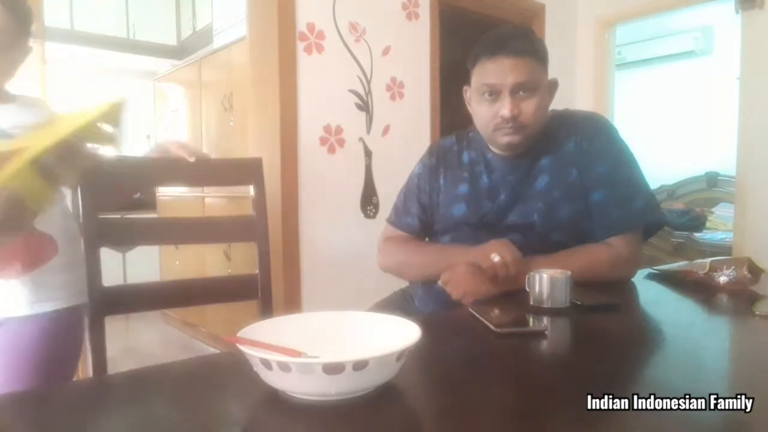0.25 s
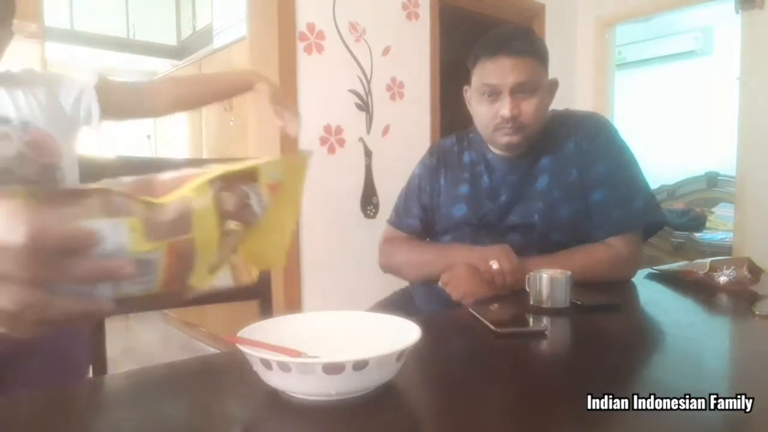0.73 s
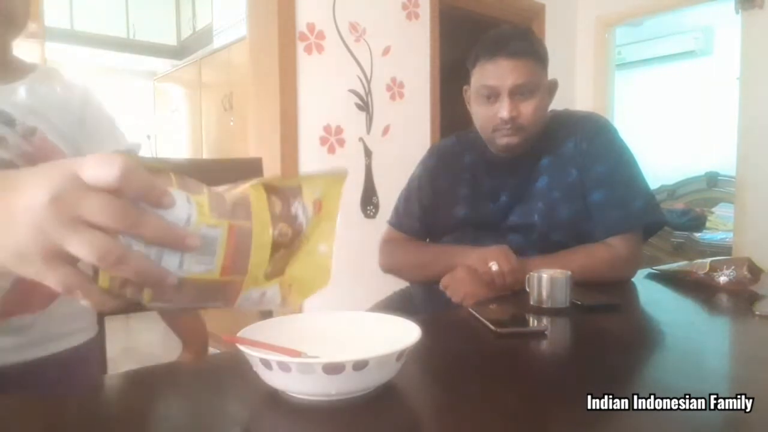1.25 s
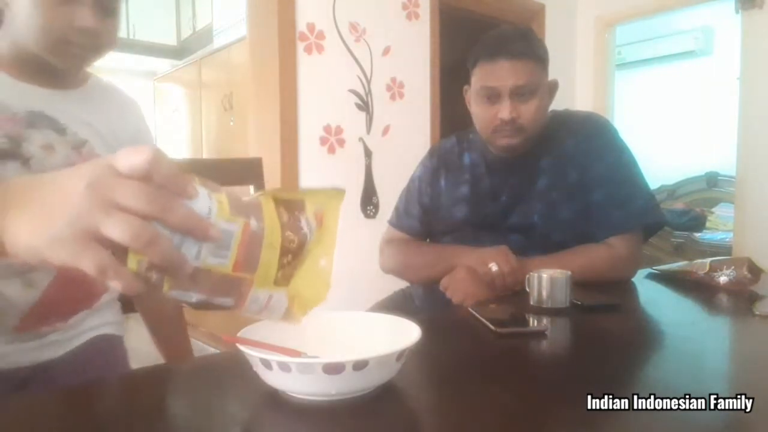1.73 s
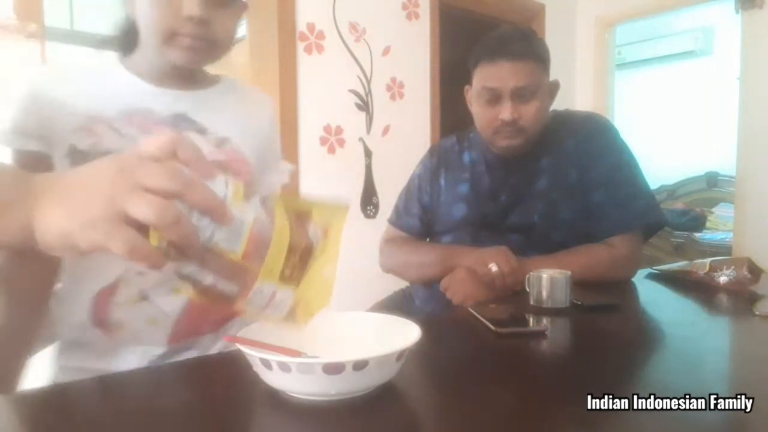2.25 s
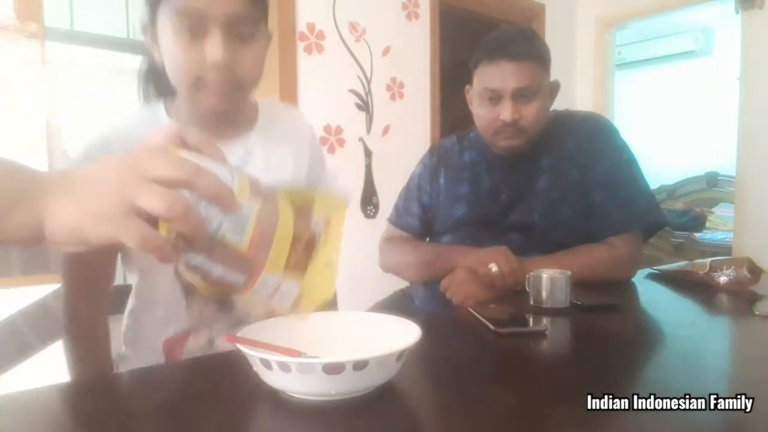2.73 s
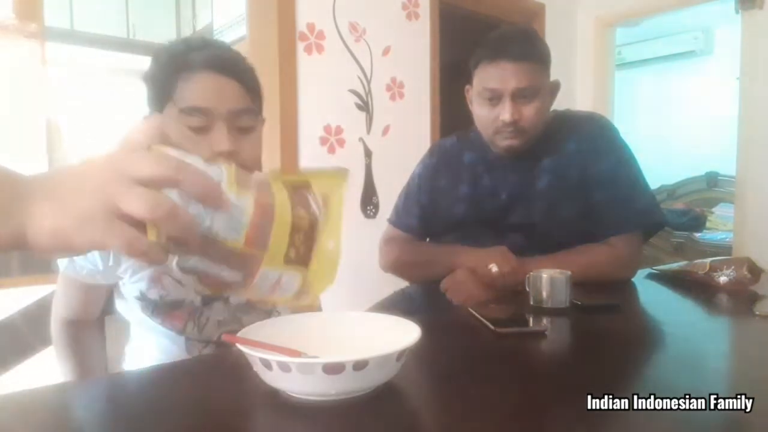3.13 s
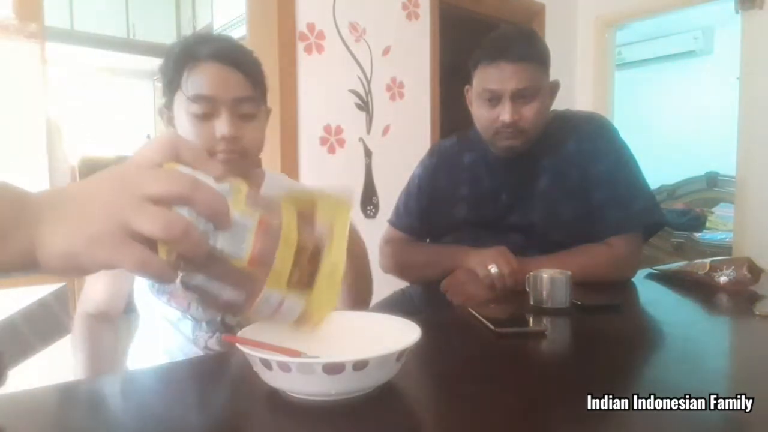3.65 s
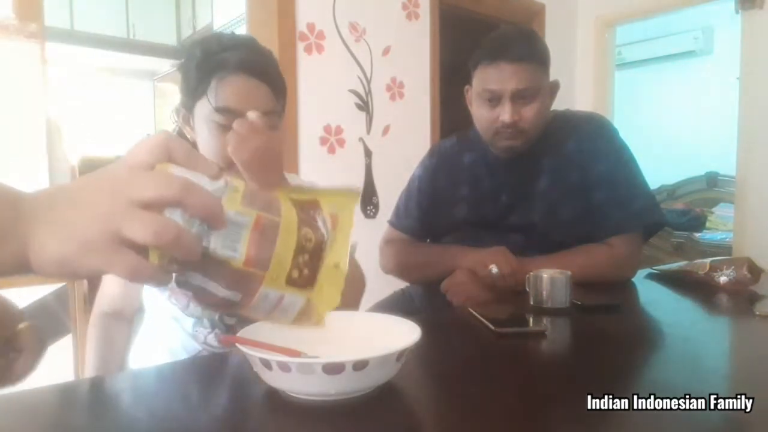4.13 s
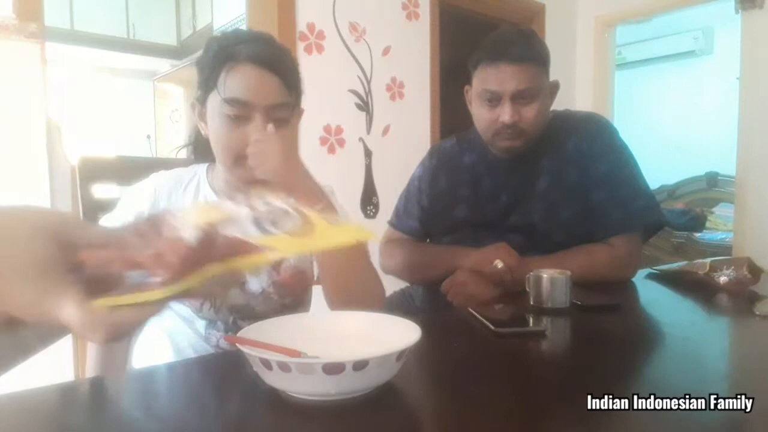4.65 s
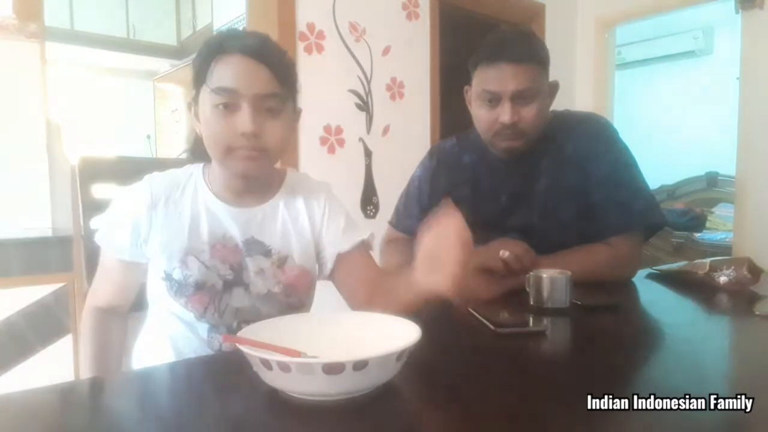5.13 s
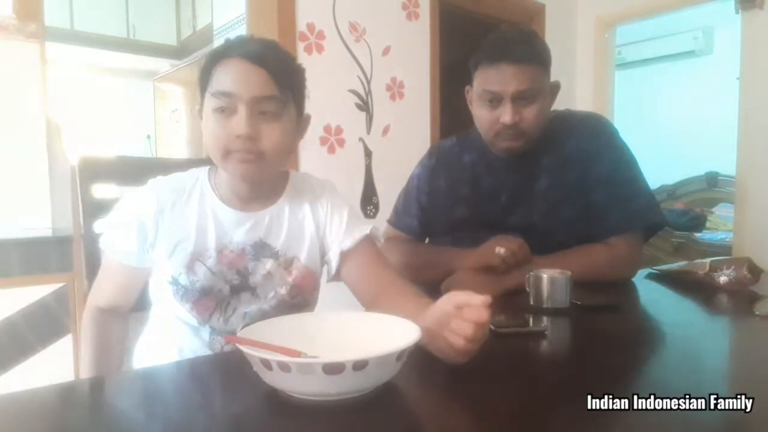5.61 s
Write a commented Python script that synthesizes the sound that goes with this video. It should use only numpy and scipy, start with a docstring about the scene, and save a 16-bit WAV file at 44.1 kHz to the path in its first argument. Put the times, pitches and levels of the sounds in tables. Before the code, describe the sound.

In a room with hard walls, someone grips and shakes a plastic packet of dry cereal. The plastic snaps and crinkles unevenly, with soft hollow knocks as the contents shift. Midway, flakes fall into a ceramic bowl with a light patter and brief ringing taps. After a lull the packet crackles again as it is carried off. The microphone picks up short echoes and a faint steady hush, nearly in mono.

```python
"""Dining table in a hard-walled room: dry cereal is shaken from a plastic packet into a ceramic bowl.
Gripped film buckles in snaps and crinkles. Flakes slide inside, then patter into the bowl and ring it.
The jolted packet knocks and puffs air, and is carried off. Nearly mono, with short echoes and a faint hush."""
import sys
import numpy as np
from scipy import signal
from scipy.fft import rfft, irfft, next_fast_len
from scipy.io import wavfile
from scipy.ndimage import uniform_filter1d

SR = 44100
rng = np.random.default_rng(int(sys.argv[2]) if len(sys.argv) > 2 else 0)


def to_wav(s):
    """Save 16-bit WAV."""
    ch = np.atleast_2d(s).T  # columns
    pcm = np.round(np.clip(ch, -1, 1) * 32767)  # PCM
    wavfile.write(sys.argv[1], SR, pcm.astype(np.int16))


N = 259308
TIME = np.arange(N) / SR

# loud buckles of the film: start_s, level_db, pitch_hz, crack_db, length_ms
FILM_SNAPS = [(0.001, -33, 3270, 0, 2.7), (0.0295, -34, 3440, -23, 1.3), (0.1128, -41, 4560, -2, 1.3),
              (0.2246, -36.5, 5500, -3, 1.4), (0.3407, -44, 4800, 0, 1.4), (0.424, -39, 4140, -4, 1.9),
              (0.568, -36.5, 4580, 2, 2.1), (0.5746, -42, 4500, 3, 1.4), (0.589, -34, 5080, 1, 3.1),
              (0.6252, -32, 3700, 4, 1.3), (0.766, -24, 4200, 5.5, 1.3), (0.8492, -33, 2330, 1, 2.3),
              (0.8863, -39, 5080, 2, 1.3), (0.922, -25, 2930, 4, 1.5), (0.955, -43, 5500, -2, 1.2),
              (0.9865, -20.5, 5470, 0, 1.54), (1, -34, 4300, -5, 1.3), (1.1926, -30, 2600, 16, 2),
              (1.2174, -30, 4030, 1, 2.4), (1.2444, -40, 5340, 1, 1.4), (1.257, -30, 6840, -10, 2.1),
              (1.449, -42, 4500, 2, 7.2), (1.4669, -23.5, 5540, 4, 2.7), (1.4803, -29, 5500, -7, 2.2),
              (1.4936, -28, 7230, -6, 1.6), (1.521, -28, 5500, 7, 1.4), (1.5228, -20.5, 5470, -19, 1.1),
              (1.537, -29, 5500, -2, 3.3), (1.546, -15, 5640, 1, .75), (1.559, -33, 5500, -5, 1.2),
              (1.5892, -25.5, 5700, 2, 1.6), (1.6272, -24, 7150, -3.5, 2.1), (1.6888, -37, 3530, 0, 1.3),
              (1.7003, -28, 4760, 7, 2), (1.7143, -34.5, 4400, -6, 1.3), (1.76, -33.5, 3050, -5, 1.8),
              (1.794, -38, 5450, 0, 1.3), (1.814, -23.5, 8150, 7, 2.1), (1.8375, -30, 6260, 9, 1.8),
              (1.863, -31, 4500, -5, 1.1), (1.878, -29, 7200, -11, 0.76), (1.927, -29, 2080, 9, 1.5),
              (1.9312, -26, 7350, -22, 1.5), (1.9616, -32, 6000, 5, 2.5), (1.97, -35, 2500, 2, 1.4),
              (2.018, -32.5, 7500, 6, 2.5), (2.104, -36, 4000, 5, 2.5), (2.141, -25, 6000, -1, 2),
              (2.1657, -27, 7580, -3, 1.2), (2.191, -29, 2240, 4, 1.9), (2.2, -22.5, 2280, 3, 3.5),
              (2.242, -25, 5150, 4, 1.1), (2.309, -42, 6000, 4, 1.2), (2.3238, -32, 4450, 3, 1.5),
              (2.447, -38, 3460, 5, 2), (2.478, -33, 5000, 9, 1.6), (2.4914, -38, 4530, 11, 1.3),
              (2.5175, -28.5, 4450, 1, 1.4), (2.6506, -30.5, 5430, -7, 2.7), (2.792, -28.5, 2400, 0, 1.4),
              (2.8036, -27.5, 3800, -5, 2.3), (2.82, -28, 7100, 15, 0.93), (2.85, -23.5, 2340, 5, 1.3),
              (2.865, -23.5, 3780, -23, 1.9), (2.9812, -28.5, 5530, 4, 9.7), (3.0894, -26.5, 2250, 12, 2.2),
              (3.1166, -26, 3220, 1, 0.83), (3.1428, -21.5, 2900, 1, 1.13), (3.1527, -19, 4340, 10, 1),
              (3.2844, -42, 3000, 5, 1.3), (3.32, -33, 2500, 16, 1.4), (3.5093, -29.5, 4900, -9, 1.04),
              (3.534, -37, 3470, -6, 1.4), (3.596, -38, 4000, -9, 1.4), (3.666, -14.5, 4550, -5, 1.4),
              (3.6808, -23.5, 2200, 15, 1.8), (3.7315, -26, 6020, 10, 3), (3.799, -28.5, 4600, 2, 2),
              (3.811, -33.5, 5340, -3, 1.2), (3.834, -33, 4200, 2, 2), (3.896, -37.5, 4000, 9, 4.1),
              (3.9153, -34.5, 3900, -4, 1.4), (4.1342, -38.5, 5700, 2, 1.4), (4.1946, -36.5, 3900, 10, 2),
              (4.529, -52, 3000, 12, 1.3), (4.557, -39.5, 2540, -17, 1.4), (4.5737, -41, 3790, -2, 1.3),
              (4.678, -42, 3540, 10, 1.7), (4.705, -37.5, 2980, -3, 1.6), (4.7755, -38.5, 3660, 2, 1.4),
              (4.8768, -35.5, 3160, -1, 1.9), (4.891, -35.5, 2870, -6, 0.95),
              (5.1743, -35, 1880, -15, 1.23), (5.1748, -35, 2820, -5, 1.2), (5.1974, -31, 4800, 11, 1.4),
              (5.2064, -22.5, 2830, -8, 1.1), (5.2353, -33, 3620, 3, 1.3), (5.243, -35, 3360, 3, 1.6),
              (5.2622, -21, 3800, -3.5, 1.1), (5.3049, -30.5, 1720, 7, 1.3), (5.321, -32, 4000, 12, 2),
              (5.343, -20.5, 3170, 3, 1.7), (5.357, -29, 3700, 2, 1.3), (5.3726, -21, 5400, 3, 1.0),
              (5.457, -27, 3800, 2, 2.6), (5.4969, -20, 6940, 7, 0.93), (5.5208, -29, 2500, 2, 1.14),
              (5.536, -27.5, 3600, 5.5, 1.4), (5.595, -26, 3970, 7, 1.4), (5.6562, -29.5, 2350, 6.5, 1.6),
              (5.69, -32.5, 3160, 1, 4.1), (5.8313, -39.5, 5860, -4, 1.2), (5.8425, -24.5, 5900, -9, 1.5),
              (5.847, -29, 3800, -4, 1.4), (5.8734, -27, 6030, 3, 1.7)]
# grips and shakes: start_s, hold_s, film_db, flakes_db
PACKET_SHAKES = [(0.0, 0.054, -48.5, -70), (0.336, 0.0051, -52, -57), (0.423, 0.012, -56.5, -54.5),
                 (0.594, 0.032, -53.5, -56.5), (0.766, 0.1, -50, -54.5), (0.916, 0.091, -53, -65),
                 (1.19, 0.0085, -45, -47), (1.218, 0.035, -53, -71), (1.467, 0.088, -47, -53),
                 (1.59, 0.015, -48, -56), (1.83, 0.035, -41.5, -50.5), (1.941, 0.11, -50, -53.5),
                 (2.106, 0.066, -47.5, -57), (2.195, 0.02, -38, -48.5), (2.454, 0.11, -51, -63),
                 (2.641, 0.011, -45.5, -47.5), (2.799, 0.043, -43.5, -52), (2.903, 0.039, -46.5, -57),
                 (2.982, 0.033, -43.5, -49), (3.08, 0.05, -43.5, -47.5), (3.163, 0.017, -40, -52.5),
                 (3.273, 0.073, -51.5, -53.5), (3.516, 0.0089, -47, -53), (3.659, 0.023, -46, -58),
                 (3.817, 0.033, -50, -54), (3.953, 0.01, -51, -59), (4.04, 0.096, -59.5, -61),
                 (4.28, 0.021, -61.5, -63.5), (4.556, 0.052, -57.5, -56), (4.793, 0.046, -54.5, -85),
                 (4.881, 0.046, -50, -54), (4.987, 0.019, -56, -58), (5.262, 0.11, -46, -52),
                 (5.455, 0.0068, -40, -50.5), (5.495, 0.039, -45.5, -47.5), (5.678, 0.0068, -49, -44.5),
                 (5.84, 0.049, -53, -69)]
# light rustle as the packet is brought in, tipped and carried off: time_s, level_db
CARRY_LEVEL = [(0, -62), (.15, -66.5), (.3, -71), (.45, -67), (.65, -58.5), (.9, -64), (1.07, -63),
               (1.3, -57.5), (1.43, -68), (1.6, -57), (2.27, -54), (2.41, -60.5), (2.6, -52), (2.77, -50.5),
               (2.95, -49.5), (3.25, -51), (3.49, -58.5), (3.6, -51), (3.9, -56), (4.3, -66.5), (4.39, -75),
               (4.52, -64), (4.6, -60), (5.0, -61), (5.15, -62.5), (5.28, -58.5), (5.6, -54), (5.8, -71)]
# finest ticks over the crinkle, highest with the film taut: time_s, gain_db
FINE_TICK_GAIN = [(0, -13.5), (1.2, -10.5), (1.55, -3.5), (2.15, -11), (2.52, -12), (2.7, -28),
                  (2.82, -7.5), (2.92, -25), (3.15, -9.5), (3.45, -19.5), (3.8, -6.5), (4.5, -23.5),
                  (5.4, -10), (5.88, -39)]
# stream of flakes landing in the bowl: time_s, level_db
POUR_LEVEL = [(0, -100), (2.0, -69), (2.2, -57), (2.35, -67.5), (2.65, -62), (2.8, -60), (2.95, -57.5),
              (3.15, -53), (3.32, -60), (3.42, -68), (3.7, -74), (4.15, -78), (4.4, -100), (5.88, -100)]
# lone flakes striking the bowl: start_s, level_db, pitch_hz
FLAKE_HITS = [(2.5243, -29.5, 3930), (2.5834, -42, 2090), (2.5913, -34, 3880), (2.615, -38, 2580),
              (2.7212, -45, 3530), (2.7713, -38, 2260), (2.8355, -28, 6600), (2.9326, -40, 3880),
              (2.9366, -38, 2500), (3.007, -30, 6100), (3.0754, -38, 2050), (3.351, -32, 5300),
              (3.4486, -41, 2270), (3.5486, -39, 3360), (3.771, -35, 4130), (3.9608, -49, 2070),
              (3.982, -36, 5070)]
# modes of bowl and table: pitch_hz, gain_db, t60_s
BOWL_MODES = [(115.2, -9.5, 0.3), (181, -6.5, 0.14), (206, -1.5, 0.11), (264, -1, 0.06), (409, 1, 0.099),
              (730, 2.5, 0.077), (1150, 2.5, 0.043), (1790, -3, 0.036), (2410, 9, 0.026), (3800, 3, .015),
              (5400, -2, 0.012)]
# hollow knocks as the load shifts and the packet changes shape: start_s, level_db, pitch_hz, t60_s
PACKET_KNOCKS = [(1.52, -38, 520, 0.057), (2.079, -55, 198, 0.22), (2.198, -29, 676, 0.049),
                 (3.151, -40, 263, 0.091), (4.479, -55.5, 398, 0.19), (4.556, -51, 687, 0.098),
                 (4.579, -49, 328, 0.089), (4.606, -53.5, 825, 0.19), (5.49, -40, 224, .05),
                 (5.658, -41.5, 500, 0.06), (5.69, -49, 767, 0.038), (5.868, -44, 480, 0.067)]
# jolts of the whole packet: start_s, level_db
PACKET_BUMPS = [(0.81, -69), (0.91, -67), (1.53, -64), (1.62, -68), (1.755, -63), (1.805, -54),
                (1.871, -60), (1.95, -71), (2.04, -66), (2.16, -72), (3.08, -64), (3.13, -63), (3.17, -64),
                (4.43, -72), (5.34, -58), (5.5, -58)]
# source spectra: freq_hz, gain_db
CRACK_SPECTRUM = [(100, -24), (600, 1.5), (1400, -2), (2200, 1.5), (5000, 1.5), (7800, 2), (9600, -10.5),
                  (13000, -8.5), (16000, -22)]
FILM_SPECTRUM = [(60, -32), (150, -15), (600, -20.5), (1200, -5), (2000, 0), (3000, -1), (4500, 1),
                 (6000, -2.5), (7700, -3), (9300, -17.5), (12000, -75), (16000, -23)]
FINE_TICK_SPECTRUM = [(4000, -36), (8000, 1.5), (10000, -6), (12500, -1.5), (14500, -8), (16000, -22)]
FLAKE_SPECTRUM = [(30, -42), (85, -35), (115, -5.5), (145, -5.5), (220, -1), (400, 4.5), (480, -0.5),
                  (700, 2), (1200, -1.5), (2400, -7), (6000, -10), (12000, -52)]
HUSH_SPECTRUM = [(25, -16), (70, -1.5), (130, 9), (300, 8.5), (550, -0.5), (1000, 0.5), (2000, 1),
                 (4000, 1), (7500, -2.5), (10000, -34), (16000, -46)]
# room decay: freq_hz, t60_s
ROOM_DECAY = [(150, 0.29), (1000, 0.49), (4000, 0.44), (8000, 0.39), (14000, 0.098)]
# stereo width of the echoes: freq_hz, side_over_mid_db
ECHO_WIDTH = [(60, -16), (250, -18), (1000, -17), (4000, -13.5), (8000, -10), (13000, -2)]


def snaps(crack_boost_db, swell_cycles, follow_db=-6, scatter=0.13, crack_rise_s=0.00047, facets=4):
    """A facet of film flips, its neighbours follow, and the crease gives a burst of tiny cracks."""
    t = TIME[:SR // 30]
    out = np.zeros(N)
    for start_s, level_db, pitch_hz, crack_db, length_ms in FILM_SNAPS:
        length_s = length_ms / 1000
        flips = facet(t, pitch_hz, swell_cycles)
        for k in range(1, facets):
            delay_s = k * length_s * rng.uniform(.6, 1.1)
            neighbour_hz = pitch_hz * np.exp(scatter * rng.standard_normal())
            flips += from_db(k * follow_db) * facet(t - delay_s, neighbour_hz, swell_cycles)
        envelope = (1 - np.exp(-t / crack_rise_s)) * np.exp(-t / length_s)
        crack = colour(rng.standard_normal(len(t)) * envelope, CRACK_SPECTRUM)
        snap = flips + from_db(crack_db + crack_boost_db) * crack / np.abs(crack).max()
        add(out, start_s, from_db(level_db) * snap / np.abs(snap).max())
    return butter(out, "high", hz=480)   # a small facet radiates no bass


def facet(t, pitch_hz, swell_cycles):
    """A flipped facet swings up in about a cycle and dies a few cycles later."""
    age = np.maximum(t, 0) * pitch_hz / swell_cycles
    return np.sin(2 * np.pi * pitch_hz * t) * age * np.exp(1 - age)


def crinkle(film_db):
    """Many small facets buckle, a few larger ones stand out, and taut film adds finer, higher ticks."""
    small = contacts(per_s=5000, spread_db=0, clump_db=5)
    large = contacts(per_s=160, spread_db=-2, clump_db=2)
    clicks = small + from_db(-12) * large
    body = rms_one(colour(grains(clicks, 625, 12400, t60_cycles=3.9), FILM_SPECTRUM))
    ticks = rms_one(colour(grains(clicks, 5070, 17000, t60_cycles=14, count=8), FINE_TICK_SPECTRUM))
    return from_db(film_db) * (body + from_db(in_time(FINE_TICK_GAIN)) * ticks)


def handling(rise_db_per_s=1006, film_fall_db_per_s=452, flakes_fall_db_per_s=373):
    """Film and flake levels in dB: each shake swells, holds and dies over the rustle of carrying."""
    carry_db = in_time(CARRY_LEVEL)
    film_power = from_db(carry_db) ** 2
    flakes_power = from_db(carry_db - 4) ** 2
    for start_s, hold_s, film_db, flakes_db in PACKET_SHAKES:
        swell_db = -rise_db_per_s * np.clip(start_s - TIME, 0, 1)
        since_s = np.clip(TIME - start_s - hold_s, 0, 1)
        film_power += from_db(film_db + swell_db - film_fall_db_per_s * since_s) ** 2
        flakes_power += from_db(flakes_db + swell_db - flakes_fall_db_per_s * since_s) ** 2
    return 10 * np.log10(film_power), 10 * np.log10(flakes_power)


def sliding_flakes(flakes_db):
    """Flakes knock on each other and on the slack wall of the packet."""
    clicks = contacts(per_s=2800, spread_db=2, clump_db=4.5)
    rattle = grains(clicks, 48, 8800, t60_cycles=1.7)
    return from_db(flakes_db) * rms_one(colour(rattle, FLAKE_SPECTRUM))


def bowl():
    """Landing flakes tap the bowl, each on its own spot, and it rings briefly."""
    taps = contacts(per_s=200, spread_db=2.5, clump_db=3)
    modes = sum(from_db(gain_db) * ring(taps * rng.standard_normal(N), pitch_hz, t60_s)
                for pitch_hz, gain_db, t60_s in BOWL_MODES)
    return from_db(in_time(POUR_LEVEL)) * rms_one(butter(modes, "high", hz=105, order=4))


def stray_flakes(bowl_db=-25):
    """A lone flake ticks at its own pitch and rings the bowl's upper modes, differently at each spot."""
    t = TIME[:SR // 10]
    out = np.zeros(N)
    for start_s, level_db, pitch_hz in FLAKE_HITS:
        tick = facet(t, pitch_hz, swell_cycles=0.87)
        modes = sum(rng.standard_normal() * from_db(gain_db) * ring(t == 0, mode_hz, t60_s)
                    for mode_hz, gain_db, t60_s in BOWL_MODES if mode_hz > 1000)
        add(out, start_s, from_db(level_db) * (tick + from_db(bowl_db) * modes))
    return out


def knocks(rise_s=0.0027, overtone_ratio=1.35, overtone_db=-10):
    """The hollow of the packet rings briefly, with one weaker overtone."""
    t = TIME[:SR // 4]
    out = np.zeros(N)
    for start_s, level_db, pitch_hz, t60_s in PACKET_KNOCKS:
        phase = 2 * np.pi * pitch_hz * t
        tone = np.sin(phase) + from_db(overtone_db) * np.sin(overtone_ratio * phase)
        envelope = (1 - np.exp(-t / rise_s)) * decay(t, t60_s)
        add(out, start_s, from_db(level_db) * tone * envelope)
    return out


def bumps(swell_s=0.01):
    """The jolted packet pushes a dull puff of air."""
    age = TIME[:SR // 4] / swell_s
    push = np.zeros(N)
    for start_s, level_db in PACKET_BUMPS:
        add(push, start_s, from_db(level_db) * age * np.exp(1 - age))
    return push * rms_one(butter(rng.standard_normal(N), "band", hz=[55, 145]))


def room(x, wet_db=-9):
    """Stereo echoes; the moving packet meets a new pattern of them every third of a second."""
    hop = SR // 3
    mid, side = np.zeros((2, N))
    for centre in range(0, N + hop, hop):
        span = np.arange(max(centre - hop, 0), min(centre + hop, N))
        piece = x[span] * np.cos(np.pi / 2 * (span - centre) / hop)
        for track, tail in zip((mid, side), echoes()):
            add(track, span[0] / SR, signal.fftconvolve(piece, tail))
    return from_db(wet_db) * (mid + colour(side, ECHO_WIDTH) * [[1], [-1]])


def echoes(early_db=5, early_s=0.00051, bands=8):
    """Mid and side response for one packet position: first off table and bowl, then off the walls."""
    t = TIME[:SR // 2]
    edges_hz = np.geomspace(40, 18000, bands + 1)
    tail = 0
    for low_hz, high_hz in zip(edges_hz, edges_hz[1:]):
        band = butter(rng.standard_normal((2, len(t))), "band", hz=[low_hz, high_hz])
        tail += band * decay(t, at_hz(ROOM_DECAY, np.sqrt(low_hz * high_hz)))
    tail /= np.sqrt(np.sum(tail[0] ** 2))
    age = t / early_s
    early = from_db(early_db) * age * np.exp(-2 * age)
    late = 1 - np.exp(-age)
    return tail * (early + late)


def room_tone(level_db=-69, side_db=-11):
    """Faint steady hush of the house."""
    mid, side = rms_one(colour(rng.standard_normal((2, N)), HUSH_SPECTRUM))
    return from_db(level_db) * (mid + from_db(side_db) * side * [[1], [-1]])


def contacts(per_s, spread_db, clump_db):
    """Random clicks in clumps, their power evened out over about 50 ms."""
    hits = rng.random(N) < per_s * from_db(clump_db * drift(rate_hz=90)) / SR
    sizes = from_db(spread_db * np.minimum(rng.exponential(1, N), 4))
    clicks = hits * sizes * rng.choice([-1, 1], N)
    power = uniform_filter1d(uniform_filter1d(clicks ** 2, SR // 20), SR // 20)
    return clicks / np.sqrt(np.abs(power) + 1e-4)


def grains(clicks, low_hz, high_hz, t60_cycles, count=24):
    """Each click rings at one of count pitches; unit rms."""
    choice = rng.integers(0, count, N)
    pitches_hz = np.geomspace(low_hz, high_hz, count)
    rings = (hz * ring(clicks * (choice == k), hz, t60_cycles / hz) for k, hz in enumerate(pitches_hz))
    return rms_one(sum(rings))


def ring(clicks, pitch_hz, t60_s):
    """Resonator: a unit click starts a decaying unit sine."""
    radius, angle = decay(1 / SR, t60_s), 2 * np.pi * pitch_hz / SR
    return signal.lfilter([0, np.sin(angle)], [1, -2 * radius * np.cos(angle), radius ** 2], clicks + 1e-18)


def drift(rate_hz):
    """Random wander, unit rms."""
    knots = rng.standard_normal(4096)
    return rms_one(np.interp(TIME * rate_hz, np.arange(len(knots)), knots))


def colour(x, spectrum):
    """Filter by a spectrum table."""
    size = next_fast_len(x.shape[-1] + 1024)
    gain = from_db(at_hz(spectrum, np.fft.rfftfreq(size, 1 / SR)))
    return irfft(rfft(x, size) * gain, size)[..., :x.shape[-1]]


def butter(x, kind, hz, order=2):
    """Butterworth filter."""
    return signal.sosfilt(signal.butter(order, hz, kind, fs=SR, output="sos"), x)


def decay(t, t60_s):
    """Gain falling 60 dB per t60_s."""
    return np.exp(-np.log(1000) * t / t60_s)


def at_hz(table, hz):
    """Read a table on a log-frequency axis."""
    freq_hz, values = np.transpose(table)
    return np.interp(np.log(np.maximum(hz, 1)), np.log(freq_hz), values)


def in_time(table):
    """Read a table at every sample."""
    return np.interp(TIME, *np.transpose(table))


def add(track, start_s, sound):
    """Mix a sound into a track."""
    start = int(np.clip(round(start_s * SR), 0, N - 1))
    track[start:start + len(sound)] += sound[:N - start]


def from_db(db):
    """Decibels to gain."""
    return 10 ** (np.asarray(db) / 20)


def rms_one(x):
    """Scale to unit rms."""
    return x / np.sqrt(np.mean(x ** 2) + 1e-20)


def scene(snap_echo_db=1):
    """Packet, flakes and bowl in the room; a facet rings towards the listener, its crack spreads all round."""
    film_db, flakes_db = handling()
    rustle = crinkle(film_db) + sliding_flakes(flakes_db) + bowl() + stray_flakes() + bumps() + knocks()
    wall_snaps = snaps(crack_boost_db=9, swell_cycles=.6)
    direct_snaps = snaps(crack_boost_db=-2.5, swell_cycles=1.08)
    reverb = room(rustle + from_db(snap_echo_db) * wall_snaps)
    return rustle + direct_snaps + reverb + room_tone()


def record(dry):
    """Steep treble cut."""
    cutoff_hz = 16100
    return signal.sosfilt(signal.ellip(10, .2, 80, cutoff_hz, fs=SR, output="sos"), dry)


dry = scene()
out = record(dry)
to_wav(out)
```